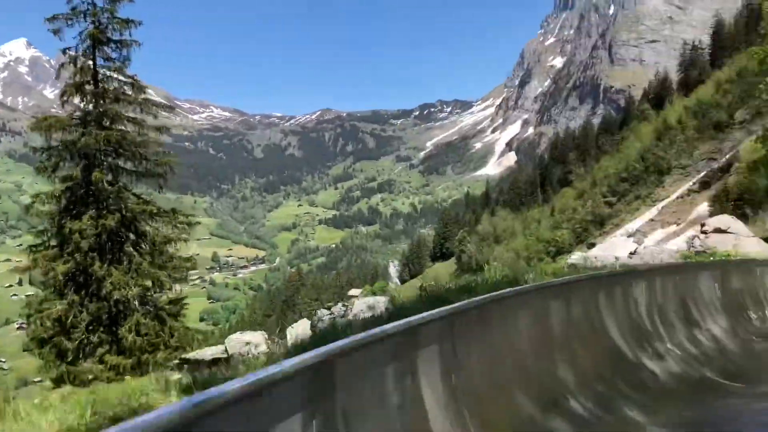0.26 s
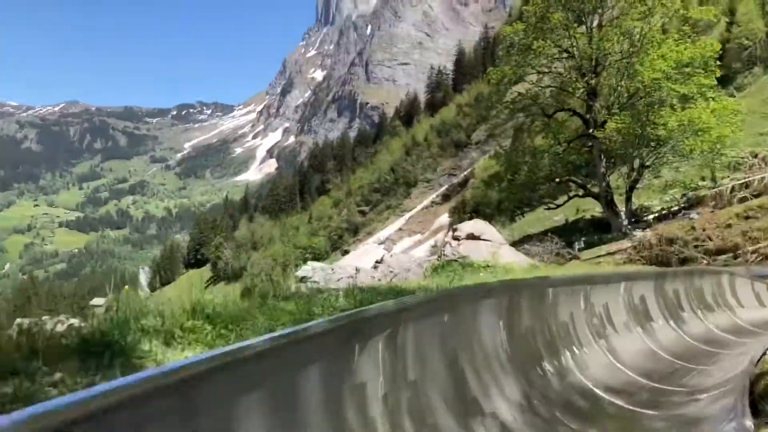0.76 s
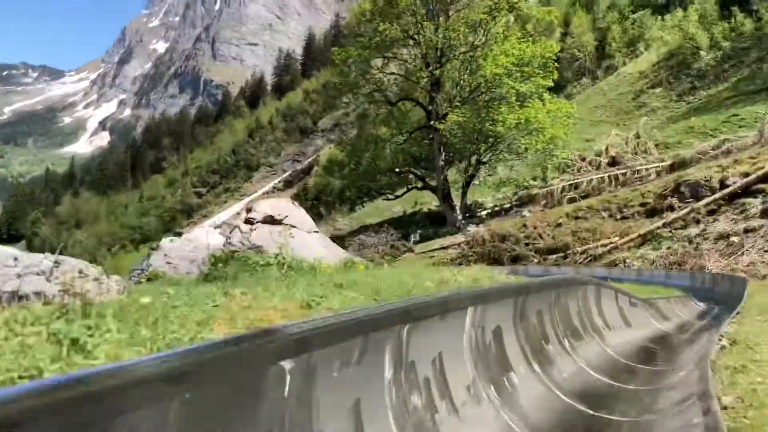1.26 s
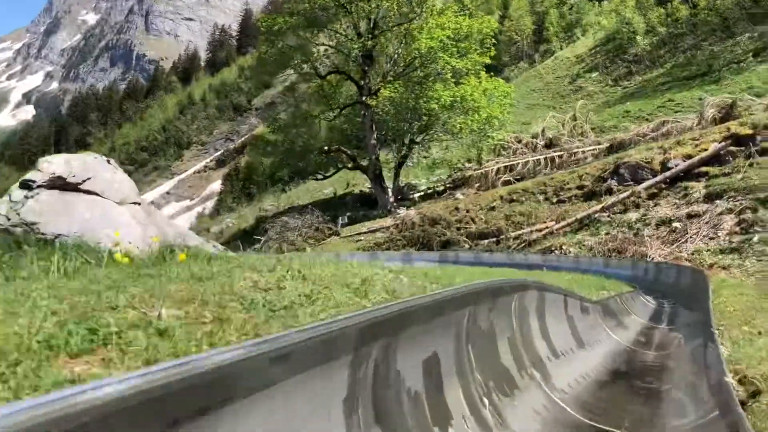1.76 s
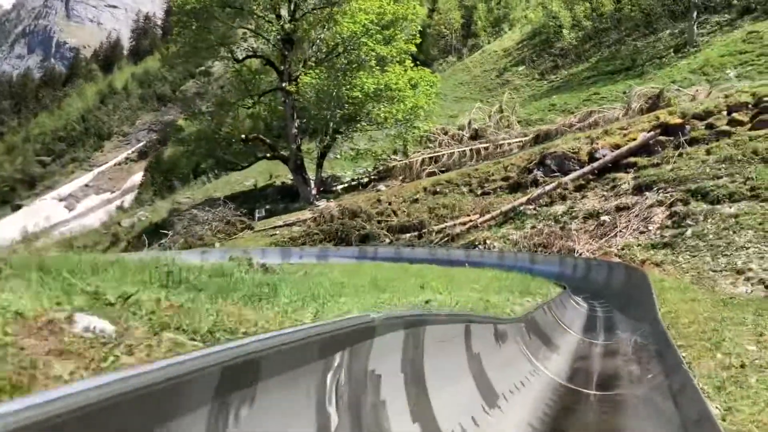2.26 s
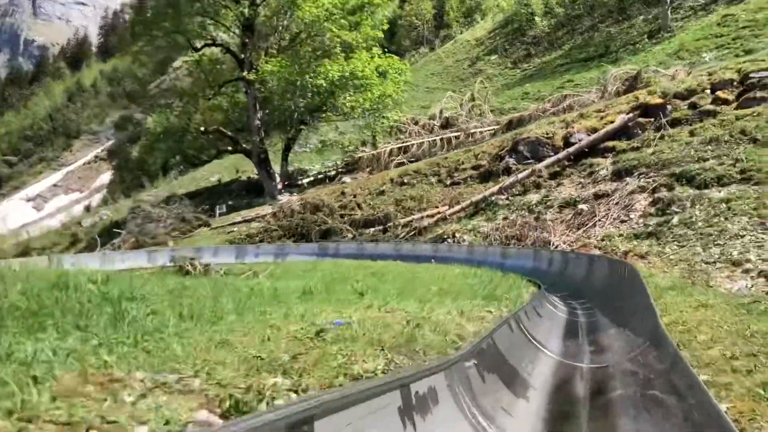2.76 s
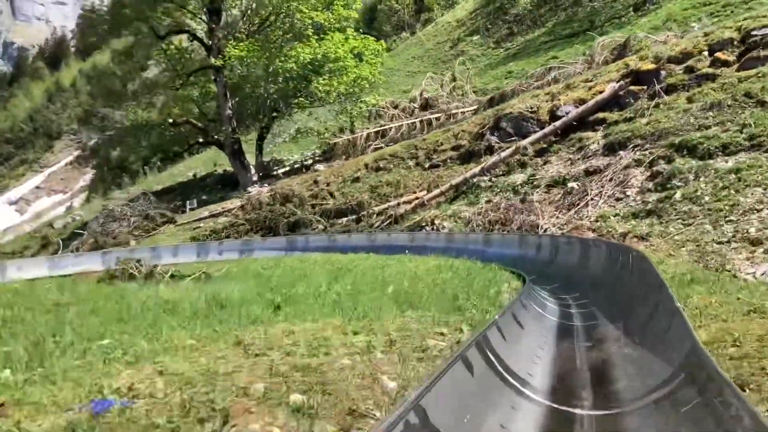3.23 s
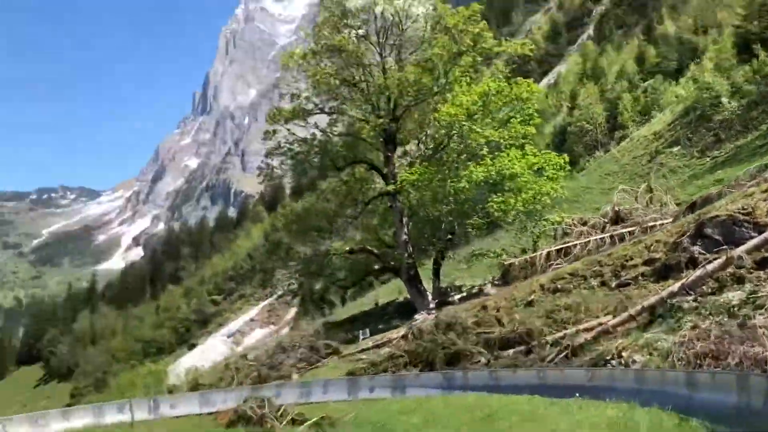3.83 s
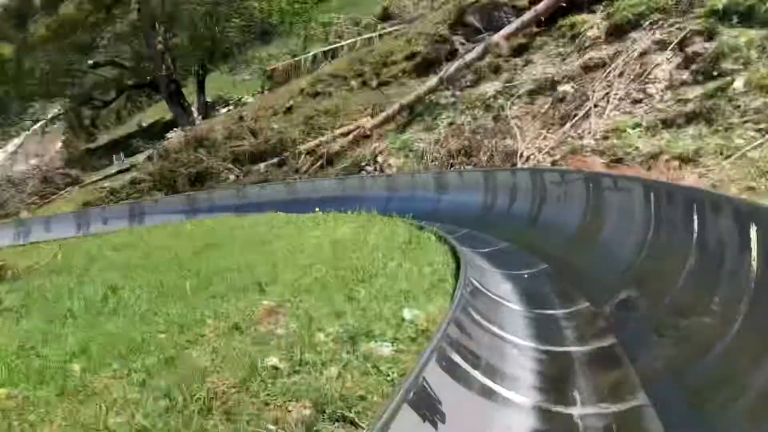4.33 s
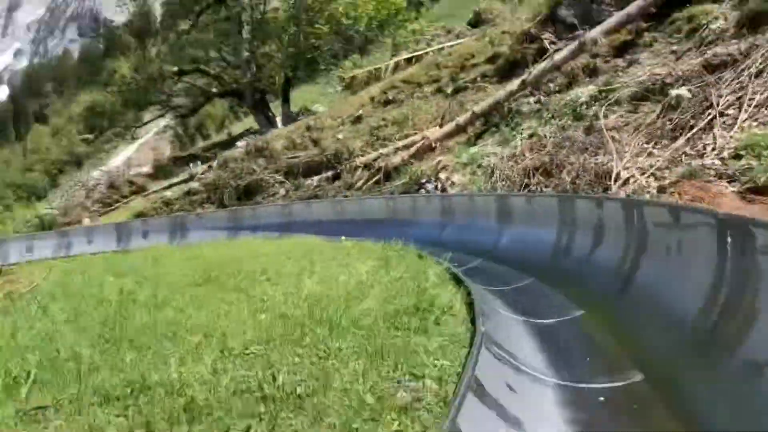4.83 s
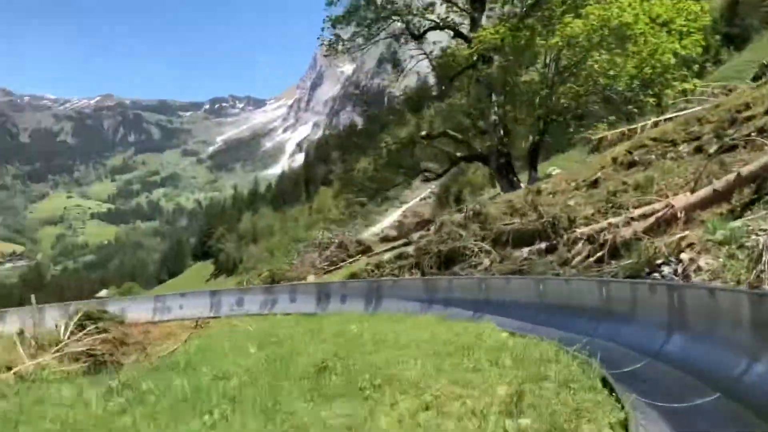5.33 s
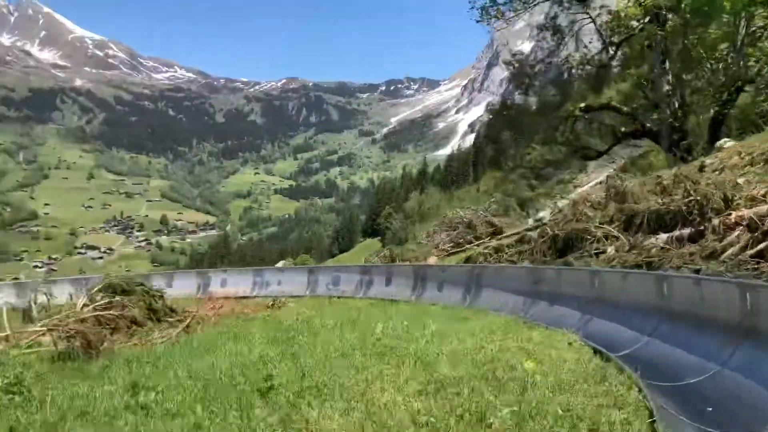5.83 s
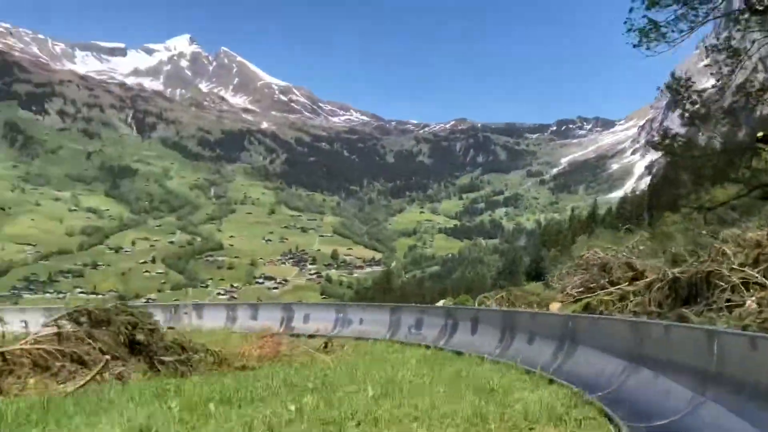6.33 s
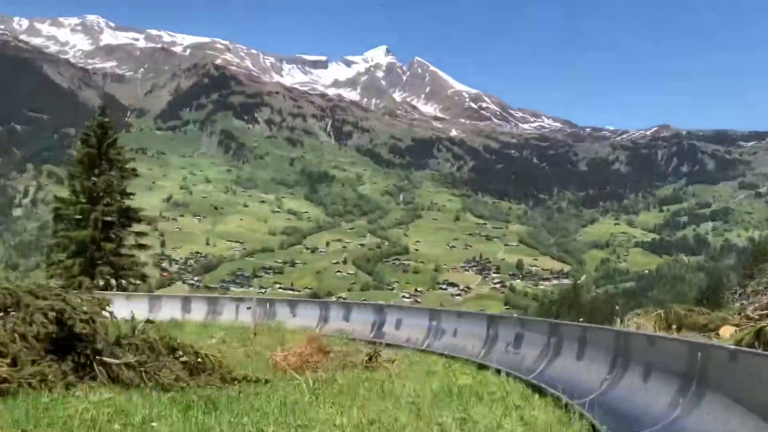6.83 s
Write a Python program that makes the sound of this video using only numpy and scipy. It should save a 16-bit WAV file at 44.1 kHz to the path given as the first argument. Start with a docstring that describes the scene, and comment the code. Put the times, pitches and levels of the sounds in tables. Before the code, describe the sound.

Close, from the seat of a wheeled sled in an outdoor metal trough: rapid irregular thuds, hollow knocks and clattering fittings at each joint, over gritty rolling and a low drone. The jolts thin out and the rolling softens midway, then the dense rattle returns and continues to the end. The steel rings briefly after blows. Single channel.

```python
"""In a steel trough a wheeled toboggan runs downhill, heard from the seat.
At each joint the wheels chatter: filtered impact trains make the shell thud and knock and loose fittings clatter.
Decaying modes and noise bursts add clicks, taps, hollow panel knocks, booming landings and steel pings.
Shaped noise makes the gritty rolling; wavering tones make the drone in the bends and the short squeaks.
The blows also excite the trough, which rings on as decaying noise."""
import sys
import numpy as np
from scipy import signal
from scipy.fft import rfft, irfft, next_fast_len
from scipy.io import wavfile
from scipy.ndimage import uniform_filter1d, map_coordinates

SR = 44100
rng = np.random.default_rng(int(sys.argv[2]) if len(sys.argv) > 2 else 0)


def file_out(sig):
    """Save sig as 16-bit WAV at sys.argv[1]."""
    # one column per channel
    cols = np.atleast_2d(sig).T
    # limit, then scale
    lim = np.clip(cols, -1, 1)
    pcm = np.round(lim * 32767).astype(np.int16)
    wavfile.write(sys.argv[1], SR, pcm)


N = 312669
TOP_HZ = 15900  # upper band limit


def amp(db):
    """Level law: decibels to amplitude gain."""
    return 10 ** (np.asarray(db) / 20)


def unit(x):
    """Power normalisation: scale to rms 1."""
    return x / np.sqrt(np.mean(x ** 2) + 1e-20)


def along(points, hz):
    """Logarithmic pitch scale: interpolate (frequency, value) points on a log axis."""
    f, value = np.transpose(points)
    return np.interp(np.log(hz + 1), np.log(f + 1), value)


def wobble(rate):
    """Slow random modulation: a smooth curve with rate knots a second."""
    knots = rng.standard_normal(size=8192)
    return map_coordinates(knots, [np.arange(N) * rate / SR], mode="wrap")


def add(track, s, x):
    """Superposition: mix x into the track from time s."""
    i = int(min(round(s * SR), N - 1))
    x, i = x[max(-i, 0):], max(i, 0)
    track[i:i + len(x)] += x[:N - i]


# resonances of the sled's shell: f/Hz, width/Hz, lift/dB
SHELL_MODES = [(181.4, 395, 6), (484.6, 116, 13), (711, 130, 10), (988, 270, 6), (1274, 180, 4),
               (1516, 270, 2.5), (2210, 120, 5), (2400, 140, 3.5), (3035, 1000, 7.5), (7570, 720, 2)]
# above this pitch the modes crowd, and only this share of the change from place to place is left
VARY_TOP_HZ, VARY_TREBLE = 3450, 0.65


def shell(spectrum, vary_db=0, size=4096):
    """Minimum-phase resonance: the shell's causal impulse response, its modes favoured differently at each place."""
    hz = np.fft.rfftfreq(size, 1 / SR)
    db = along(spectrum, hz)
    for f, width, lift in SHELL_MODES:
        db = db + lift / (1 + (2 * (hz - f) / width) ** 2)
    place = rng.standard_normal(size=64)
    colour = np.interp(np.sqrt(hz / hz[-1]), np.linspace(0, 1, len(place)), place)
    db = db + vary_db * np.where(hz < VARY_TOP_HZ, 1, VARY_TREBLE) * colour
    # folding the cepstrum onto positive times makes the response causal
    cepstrum = irfft(np.log(amp(db)))
    cepstrum[1:size // 2] *= 2
    cepstrum[size // 2 + 1:] = 0
    return irfft(np.exp(rfft(cepstrum)))[:size // 2]


def impacts(rate, spread_db, size):
    """Shot noise: random tiny impacts, rate a second on average, of scattered strength."""
    hit = rng.random(size) < rate / SR
    strength = amp(spread_db * np.clip(rng.standard_normal(size), -2, 2))
    return hit * np.sign(rng.standard_normal(size)) * strength


# wheels jolting over joints and dents: t/s, length/s, knock level/dB, weight (thud over knock before its trim)/dB
JOLTS = [(0.106, 0.0039, -23.5, 3), (0.179, 0.032, -26, -0.5), (0.321, 0.017, -30.5, 5.5),
         (0.395, 0.038, -25, -2), (0.547, 0.032, -24, -0.5), (0.63, 0.023, -31, 6.5),
         (.779, 0.023, -31.5, -1), (0.866, 0.028, -22.5, 0), (1.015, 0.033, -25.5, -5),
         (1.104, 0.024, -24, -2), (1.25, 0.032, -28.5, 1.5), (1.347, 0.043, -26.5, 0.5),
         (1.487, 0.039, -25.5, 2), (1.64, 0.051, -24.5, -2), (1.826, 0.054, -32, 6),
         (2.105, 0.016, -20.5, -1), (2.321, 0.058, -31, 4.5), (2.595, 0.063, -30.5, 0.5),
         (2.862, 0.02, -41.5, 10), (3.409, 0.016, -27, -2), (3.601, 0.013, -31.5, -4.5),
         (3.953, 0.033, -29.5, 3), (4.603, 0.017, -23, -3), (4.811, 0.04, -25.5, -3),
         (4.996, 0.049, -27.5, -3), (5.154, 0.051, -26, -5.5), (5.345, 0.054, -32.5, -4.5),
         (5.47, 0.044, -34, 2), (5.689, 0.028, -32, -5), (5.798, 0.032, -26, -2), (5.982, 0.024, -31.5, 0),
         (6.09, 0.023, -28.5, 3.5), (6.271, 0.029, -31.5, -9), (6.359, 0.037, -27, -2),
         (6.429, 0.0078, -35, 14.5), (6.526, 0.0074, -25.5, 6.5), (6.62, 0.018, -22, -4),
         (6.78, 0.027, -31.5, 4), (6.863, 0.027, -26, 1), (7.017, 0.035, -26, -4)]
CONTACT_SHARE = 0.99  # part of a jolt in which the wheels hammer; the rest dies away
HOLD_CHANGE_DB = -1.5  # the hammering eases by this much through the contact
LEAD_DB, LEAD_S = -11, 0.016  # the wheels meet the lip first: strength against the jolt, rise time


def chatter(levels_db, spectrum, rate, spread_db, vary_db, attack, release, count=3, size=6144):
    """Source-filter principle: bursts of impacts, shared among count differently coloured parts of the shell."""
    early = .03  # room for the lead-in, s
    out, t = np.zeros(N), np.arange(size) / SR - early
    after = np.maximum(t, 0)
    lead_in = amp(LEAD_DB) * np.exp(np.minimum(t, 0) / LEAD_S)
    rise = np.maximum(1 - np.exp(-after / attack), lead_in)
    for (s, length, *_), db in zip(JOLTS, levels_db):
        hold = CONTACT_SHARE * length
        easing = amp(HOLD_CHANGE_DB * np.minimum(after / hold, 1))
        contact = rise * easing * np.exp(-np.maximum(t - hold, 0) / release)
        hammering = unit(impacts(rate, spread_db, size))
        force = contact * (hammering + .2 * rng.standard_normal(size))
        part = rng.integers(count, size=size)
        burst = sum(signal.fftconvolve(force * (part == k), shell(spectrum, vary_db)) for k in range(count))
        # the burst's energy equals that of its level held for its length
        add(out, s - early, amp(db) * burst * np.sqrt(length * SR / np.sum(burst ** 2)))
    return out


# spectra that drive the shell in a jolt, each: f/Hz, relative level/dB
THUD = [(50, -72.5), (70, -22), (100, -9), (160, -1), (220, 0.5), (300, -4.5), (420, -6), (800, -70)]
KNOCK = [(120, -42), (260, -15.5), (400, -1.5), (560, 2), (800, -5.5), (1300, -7.5), (1800, -12),
         (2800, -19), (6000, -28)]
CLATTER = [(700, -21.5), (1700, 9), (3000, -10), (3900, -1), (6000, 1), (10000, -7.5), (16000, -38)]
CLATTER_DB, CLATTER_GROWS = -23, 0.78  # answer to a 0 dB jolt; dB of clatter per dB of jolt


def jolts():
    """Impact excitation: every jolt knocks, heavier bounces thud more, and fittings clatter even at light ones."""
    _, _, db, weight_db = np.transpose(JOLTS)
    thud = chatter(db + weight_db, THUD, rate=430, spread_db=4.5, vary_db=0.5,
                   attack=0.0022, release=0.0077, count=1)
    knock = chatter(db, KNOCK, rate=340, spread_db=1.5, vary_db=4, attack=0.0018, release=0.011)
    clatter = chatter(CLATTER_DB + CLATTER_GROWS * db, CLATTER, rate=130, spread_db=3, vary_db=6.5,
                      attack=0.002, release=0.011)
    return amp(-2) * thud + knock + clatter


# hard contacts of loose fittings: t/s, relative level/dB, relative snap level/dB
CLICKS = [(0.1053, -10.5, -31), (0.178, -11, -33), (0.4002, -19, -35), (0.4122, -13.5, -33),
          (0.4337, -13, -33), (0.661, -21, -40), (0.8773, -10.5, -33), (0.9034, -20, -33.5),
          (1.029, -22, -40.5), (1.1129, -17, -44), (1.1364, -16.5, -28.5), (1.382, -18, -37),
          (1.534, -23, -42), (1.657, -17, -32.5), (1.669, -23.5, -35.5), (1.8753, -17, -35.5),
          (2.113, -17.5, -34.5), (2.371, -11, -29), (2.6378, -19, -37), (2.8877, -26, -38),
          (3.4099, -25, -32.5), (3.428, -26, -36), (3.9826, -28.5, -44), (4.9802, -21, -41.5),
          (5.0221, -15, -32.5), (5.1549, -11, -30), (5.1704, -33, -34), (5.6938, -19.5, -39),
          (5.802, -16.5, -37), (5.9989, -22.5, -32.5), (6.122, -32, -41), (6.3635, -18, -43),
          (6.545, -16, -32), (6.6204, -28, -39)]
# spectra of the shell's clack and the bright snap, each: f/Hz, relative level/dB
CLACK = [(50, -13), (200, 4), (500, 3.5), (1500, 5.5), (3000, -4), (4500, -5.5), (8000, -30), (16000, -21)]
SNAP = [(2000, -26), (5000, -3), (9000, -2.5), (16000, -8.5)]
# a fitting falls back once, more softly: mean delay's log centre, its log scatter, loss
REBOUND_S, REBOUND_SCATTER, REBOUND_LOSS_DB = 0.011, .25, 11
# each strike rings a few modes within about an octave of this pitch
FITTING_HZ, FITTING_T60_S, FITTING_DB = 1693, 0.033, -17.5


def clicks(size=3072, lead=0.0036):
    """Collision with restitution: a brief graze, then clack, bright snap and short modal ring; then one rebound."""
    out, t = np.zeros(N), np.arange(size) / SR - lead
    after = np.maximum(t, 0)

    def crack(spectrum, t60):
        """Transient excitation: a decaying noise burst filtered by the shell."""
        graze = 0.38 * np.exp(np.minimum(t, 0) / 0.0015)
        contact = graze + 1 - np.exp(-after / 0.0023)
        burst = rng.standard_normal(size) * contact * amp(-60 * after / t60)
        x = signal.fftconvolve(burst, shell(spectrum, vary_db=3))[:size]
        return x / np.sqrt(np.sum(x ** 2) / (0.0022 * SR))

    def ring(count=3):
        """Modal decay: a few damped sines begin at contact."""
        hz = FITTING_HZ * 2 ** rng.uniform(-1.038, 1, (count, 1))
        return np.sin(2 * np.pi * hz * after).sum(axis=0) * amp(-60 * after / FITTING_T60_S)

    def strike(db, snap_db):
        """Superposition: ring, clack and snap of one contact."""
        clack = amp(db - 4.0) * crack(CLACK, t60=0.018)
        snap = amp(snap_db + 2.5) * crack(SNAP, t60=0.025)
        return amp(db + FITTING_DB) * ring() + clack + snap

    for s, db, snap_db in CLICKS:
        flight = REBOUND_S * np.exp(REBOUND_SCATTER * rng.standard_normal())
        add(out, s - lead, strike(db, snap_db))
        add(out, s - lead + flight, amp(-REBOUND_LOSS_DB) * strike(db, snap_db))
    return out


# single hollow knocks of panels under load: t/s, f/Hz, relative level/dB
BONKS = [(.413, 480, -6), (.549, 603, -17), (1.384, 547, -11.5), (1.491, 690, -14), (1.644, 610, -14),
         (1.838, 197.3, -19), (2.372, 442, -11), (2.403, 670, -14), (2.617, 488, -20), (2.797, 697, -25),
         (2.944, 540, -22.5), (3.097, 700, -23), (3.739, 1030, -23.5), (3.886, 990, -20),
         (4.138, 366, -18.5), (4.833, 490, -11), (4.982, 614, -12.5), (5.022, 435, -11.5),
         (5.396, 680, -15), (6.379, 705, -11), (6.397, 520, -19), (6.429, 900, -9.5), (6.442, 910, -16),
         (6.528, 1025, -7), (6.53, 461, -18), (6.631, 476, -10.5), (7.035, 223, -17)]
# what a struck panel rings with: multiple of its pitch, level/dB
PANEL_MODES = [(.66, -11), (1, 1), (1.45, -10.5)]
PANEL_T60_S, PANEL_DAMPING = 0.039, 1.4  # ring time at 500 Hz; it falls with this power of the pitch


def bonks(knock_db=-9):
    """Damped plate modes: a broad knock and short modes that sag as the load comes off; low panels ring longest."""
    out, t = np.zeros(N), np.arange(SR // 3) / SR
    for s, hz, db in BONKS:
        t60 = PANEL_T60_S * (500 / hz) ** PANEL_DAMPING
        sag = 1 + 0.072 * np.exp(-t / 0.0011)
        phase = 2 * np.pi * np.cumsum(hz * sag) / SR
        ring = sum(amp(level) * np.sin(ratio * phase) for ratio, level in PANEL_MODES)
        add(out, s, amp(db - 60 * t / t60) * (1 - np.exp(-t / 0.002)) * ring)
        knock = shell(KNOCK, vary_db=1)
        add(out, s, amp(db + knock_db) * knock / np.abs(knock).max())
    return out


# the sled lands heavily and its seat booms: t/s, peak level/dB
THUMPS = [(0.405, -21.5), (1.109, -24.5), (2.097, -21.5), (3.952, -31), (4.797, -29.5), (5.151, -31),
          (5.353, -23.5), (5.797, -25), (7.028, -30)]
# starting pitch, time to the peak, and fall of the pitch as the load comes off
THUMP_HZ, THUMP_RISE_S, THUMP_SAG_HZ_PER_S = 203.8, 0.018, 1000


def thumps():
    """Load-dependent resonance: a heavy landing sounds one low note that swells, sags and dies."""
    out, t = np.zeros(N), np.arange(SR // 7) / SR
    swell = (t / THUMP_RISE_S * np.exp(1 - t / THUMP_RISE_S)) ** 2
    phase = 2 * np.pi * np.cumsum(THUMP_HZ - THUMP_SAG_HZ_PER_S * t) / SR
    for s, db in THUMPS:
        add(out, s, amp(db) * swell * np.sin(phase))
    return out


# centre of a loose part's modes, ring time, contact noise against one mode
TAP_HZ, TAP_T60_S, TAP_CRACK_DB = 2396, 0.037, 1.5


def tap(count=4, size=2048):
    """Modal excitation: one light contact gives a tiny crack and a few short modes, peak 1."""
    t = np.arange(size) / SR
    hz = TAP_HZ * np.exp(rng.uniform(-0.45, 0.376, count))
    ring = np.sin(2 * np.pi * np.outer(t, hz)).sum(axis=1)
    smoothed = np.convolve(rng.standard_normal(size), np.hanning(9), "same")
    crack = amp(TAP_CRACK_DB) * unit(smoothed)
    x = (ring + crack) * amp(-60 * t / TAP_T60_S)
    return x / np.abs(x).max()


# light taps of loose parts against the shell: t/s, peak level/dB
TAPS = [(.080, -33), (0.335, -19.5), (1.423, -31.5), (1.702, -28), (1.823, -27), (2.338, -23.5),
        (2.945, -28), (4.998, -26), (5.139, -27), (6.286, -27.5)]


def taps():
    """Isolated light impacts: loose parts tap the shell."""
    out = np.zeros(N)
    for s, db in TAPS:
        add(out, s, amp(db) * tap())
    return out


# brief rubs of the sled against the steel: t/s, length/s, f/Hz, level/dB
SQUEAKS = [(.003, 0.017, 2240, -35.5), (0.222, 0.024, 2340, -38), (6.608, 0.013, 5900, -42)]


def squeaks():
    """Stick-slip friction: the sled's edge gives a swelling, unsteady tone with overtones that dies again."""
    out = np.zeros(N)
    waver = 1 + .028 * wobble(700)
    for s, length, hz, db in SQUEAKS:
        n = int(length * SR)
        phase = 2 * np.pi * np.cumsum(hz * waver[int(s * SR):][:n]) / SR
        tone = np.zeros(n)
        for k in range(6):
            if (k + 1) * hz < TOP_HZ:
                tone += amp(-7 * k) * np.sin((k + 1) * phase)
        add(out, s, amp(db) * unit(tone * np.hanning(n)))
    return out


# a small steel part left ringing: t/s, level/dB
PINGS = [(.878, -43.5), (1.877, -56), (2.113, -44.5), (2.373, -53), (2.658, -48.5)]
# its modes: f/Hz, level/dB, t60/s
STEEL = [(4877, 0, .38), (7725, -7, .14)]


def pings():
    """Free vibration: one steel part rings in lightly damped modes."""
    out, t = np.zeros(N), np.arange(SR // 2) / SR
    ring = sum(amp(db - 60 * t / t60) * np.sin(2 * np.pi * hz * t) for hz, db, t60 in STEEL)
    for s, db in PINGS:
        add(out, s, amp(db) * ring)
    return out


# rolling between the joints: t/s, relative rumble level/dB, relative wheel level/dB
ROLL = [(0.0, -37.5, -32), (1.56, -46.5, -35.5), (1.89, -45, -38), (3.37, -51.5, -39), (4.9, -42, -36.5),
        (5.96, -42, -40), (7.09, -39, -37.5)]
# spectra of the rolling layers, each: f/Hz, relative level/dB
RUMBLE = [(50, -32), (70, -26), (92, 0.5), (170, 1.5), (260, -2), (380, -11.5), (700, -32.5)]
WHEELS = [(150, -24), (330, -3.5), (600, -3.5), (800, -6.5), (1150, -3.5), (1600, -9.5), (2050, -11.5),
          (3200, -16), (4200, -23), (8000, -42.5)]
HUM = [(420, -31.5), (490, -19), (560, -20.5), (695, -11), (900, -52)]  # hollow hum of the rolling wheels
HISS = [(2000, -67), (3800, 3), (6000, 4), (8000, 5), (10000, 0.5), (16000, -6)]
FIZZ = [(5000, -39), (10000, 4), (16000, -7)]


def rolling():
    """Roughness excitation: wheels on steel give a rush coloured by the shell, hum, hiss and ticking of loose parts."""
    s, *levels = np.transpose(ROLL)
    rumble_db, wheel_db = [np.interp(np.arange(N) / SR, s, level) for level in levels]

    def rush(spectrum, sway_db, rate):
        """Filtered noise: a swaying random force drives the shell."""
        force = rng.standard_normal(N) * amp(sway_db * wobble(rate))
        return unit(signal.fftconvolve(force, shell(spectrum))[:N])

    rumble = amp(rumble_db - 3.5) * rush(RUMBLE, sway_db=0.5, rate=10)
    wheel_rush = patchy(rush(WHEELS, sway_db=2.5, rate=110), depth_db=2, size=(4, 6))
    wheels = amp(wheel_db - 4.5) * wheel_rush
    hum = amp(wheel_db - 10.5) * rush(HUM, sway_db=2.5, rate=25)
    # the hiss follows the wheels only a little; the finest fizz follows the rumble
    hiss_rush = patchy(rush(HISS, sway_db=.7, rate=90), depth_db=1.6, size=(7, 50))
    hiss = amp(0.39 * wheel_db - 43.5) * hiss_rush
    fizz_rush = patchy(rush(FIZZ, sway_db=1.5, rate=60), depth_db=2)
    fizz = amp(0.77 * rumble_db - 42.0) * fizz_rush
    ticking = amp(wheel_db - 14.5) * jiggle()
    return rumble + wheels + hum + hiss + fizz + ticking


def patchy(x, depth_db, size=(5, 24)):
    """Time-varying filtering: a rush shifts colour as different patches of steel pass under the sled."""
    z = signal.stft(x, nperseg=512)[2]
    across_pitch = uniform_filter1d(rng.standard_normal(z.shape), size[0], 0)
    field = uniform_filter1d(across_pitch, size[1], 1)
    return unit(signal.istft(z * amp(depth_db * unit(field)), nperseg=512)[1][:N])


def jiggle(spread_db=2.7, count=330):
    """Jittered impact train: rolling keeps loose parts ticking unevenly, dozens of times a second."""
    out = np.zeros(N)
    scatter = np.clip(rng.standard_normal((count, 2)), -2, 2)
    for i, (shift, strength) in enumerate(scatter):
        add(out, (i + .5 * shift) * N / SR / count, amp(spread_db * strength) * tap())
    return unit(out)


# the wheels drone when pressed into a bend: t/s, f/Hz, relative level/dB
DRONE = [(0, 217, -41), (1.42, 198.3, -42.5), (2.0, 181.6, -67), (5.5, 204.9, -50), (6.6, 225, -59),
         (7.09, 226.6, -35)]


def drone(octave_below_db=-13):
    """Frequency and amplitude modulation: the loaded wheels' low tone wavers, with a weaker one an octave below."""
    s, *columns = np.transpose(DRONE)
    hz, db = [np.interp(np.arange(N) / SR, s, c) for c in columns]
    phase = 2 * np.pi * np.cumsum(hz * (1 + .035 * wobble(22))) / SR
    main = np.sin(phase) * amp(2.5 * wobble(18))
    below = np.sin(phase / 2) * amp(octave_below_db + 2.5 * wobble(18))
    return amp(db) * unit(main + below)


# how long the trough rings: f/Hz, t60/s
TROUGH = [(170, 0.53), (500, 0.3), (2000, 0.15), (10000, 0.11)]


def trough(x, count=24):
    """Reverberant decay: the steel sheets ring on, differently in each of count stretches of the run."""
    out = np.zeros(N)
    edges = np.linspace(0, N, count + 1).astype(int)
    for a, b in zip(edges, edges[1:]):
        hz, t, z = signal.stft(rng.standard_normal(SR // 2), SR, nperseg=256)
        decay = amp(-60 * t / along(TROUGH, hz)[:, None])
        tail = signal.istft(z * decay, SR, nperseg=256)[1]
        # the ringing follows 4 ms after the blow
        add(out, a / SR + .004, signal.fftconvolve(x[a:b], tail / np.linalg.norm(tail)))
    return out


def scene():
    """Superposition: the sled and the trough under it, as one channel."""
    blows = jolts() + clicks() + bonks() + thumps() + taps()
    mix = blows + squeaks() + pings() + rolling() + drone() + amp(-13) * trough(blows)
    return mix[None]


def record(dry, low_cut_hz=62):
    """Band limitation: a high-pass cuts the deep bass and nothing is kept from TOP_HZ upward."""
    x = signal.sosfilt(signal.butter(4, low_cut_hz, "highpass", fs=SR, output="sos"), dry)
    m = next_fast_len(N + SR // 2)
    kept = np.fft.rfftfreq(m, 1 / SR) < TOP_HZ
    return irfft(rfft(x, m) * kept, m)[..., :N]


dry = scene()
out = record(dry)
file_out(out)
```